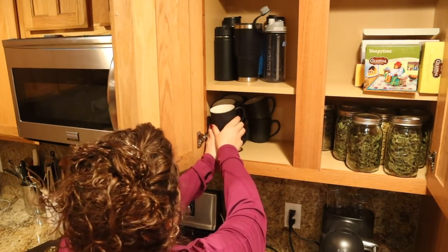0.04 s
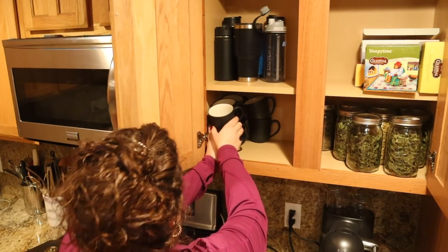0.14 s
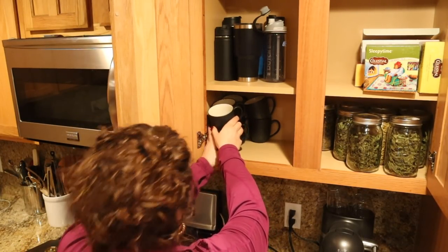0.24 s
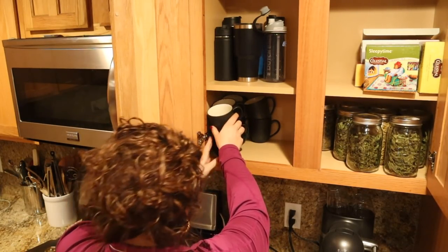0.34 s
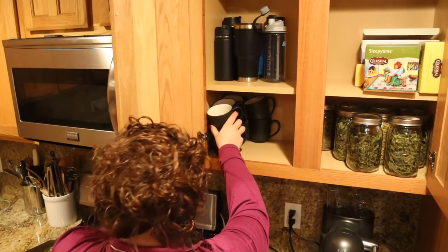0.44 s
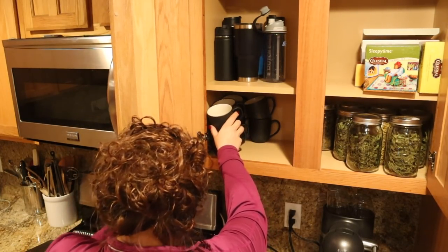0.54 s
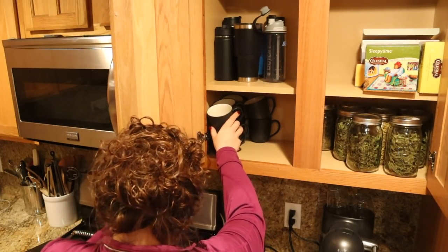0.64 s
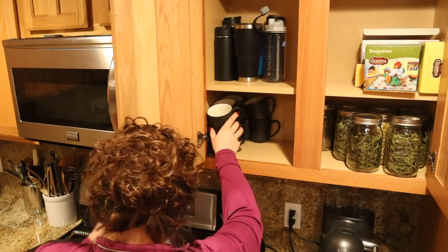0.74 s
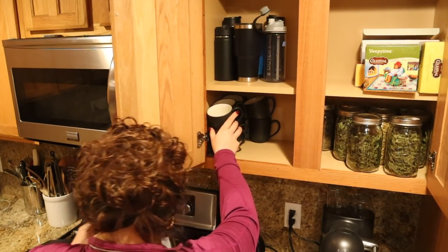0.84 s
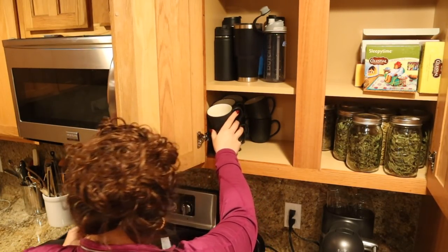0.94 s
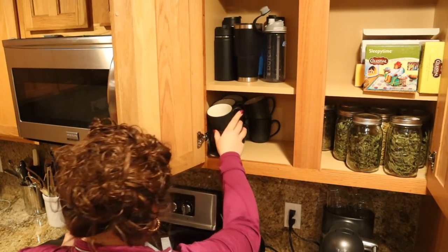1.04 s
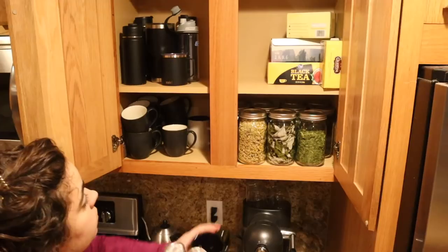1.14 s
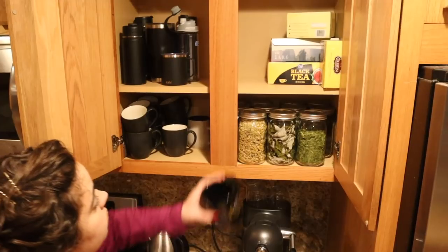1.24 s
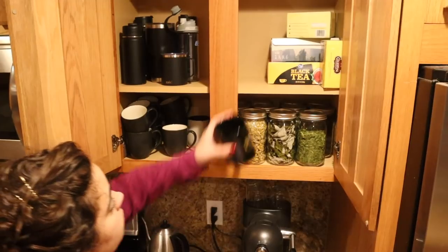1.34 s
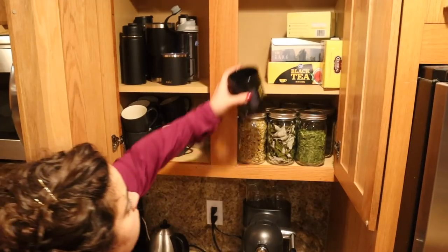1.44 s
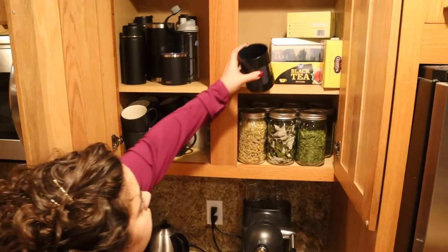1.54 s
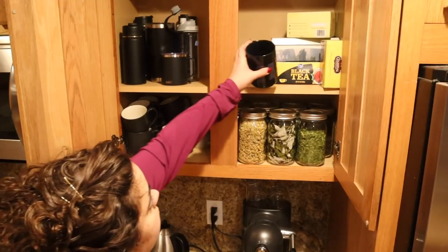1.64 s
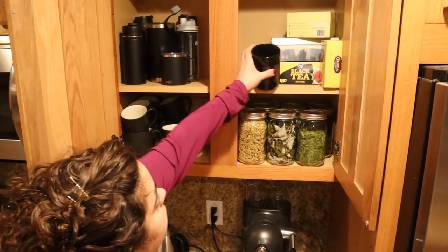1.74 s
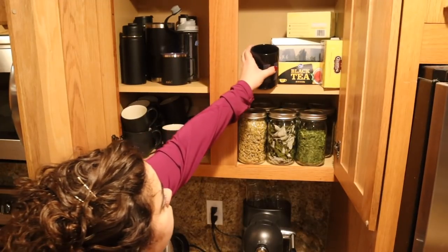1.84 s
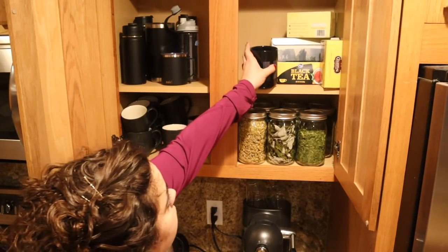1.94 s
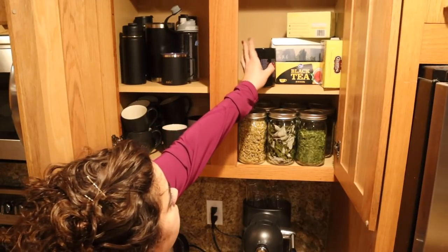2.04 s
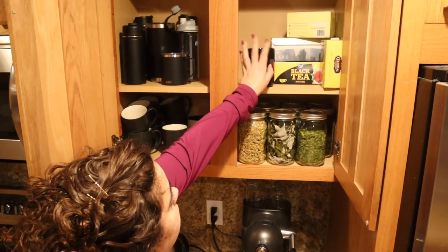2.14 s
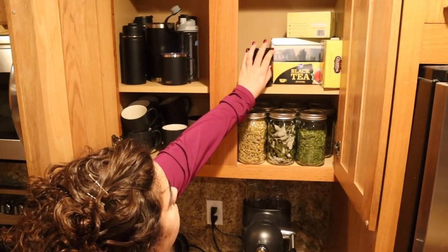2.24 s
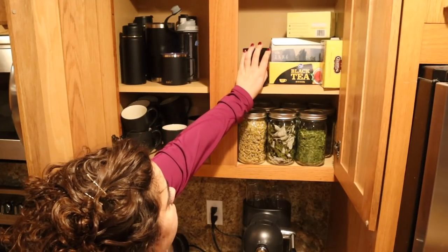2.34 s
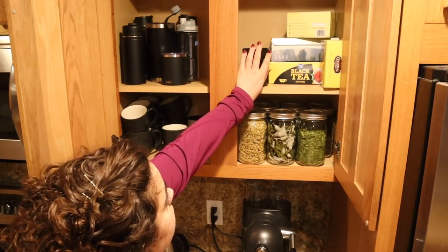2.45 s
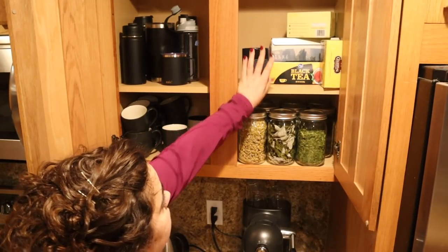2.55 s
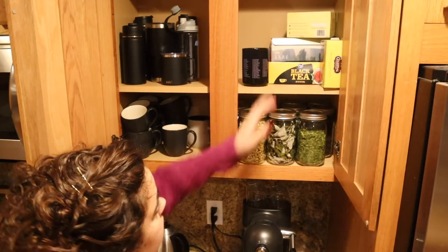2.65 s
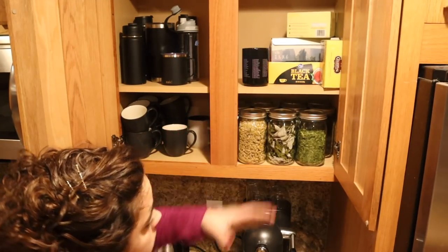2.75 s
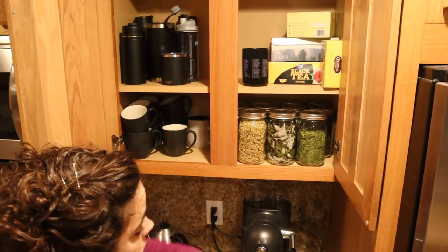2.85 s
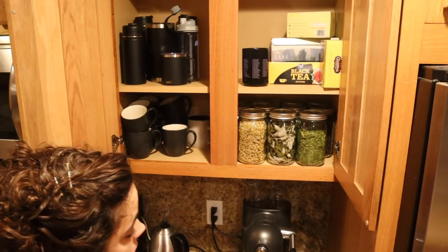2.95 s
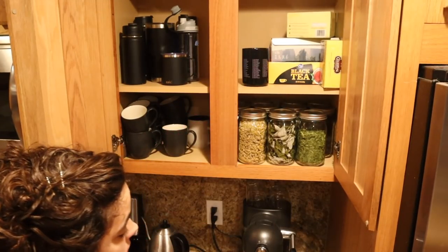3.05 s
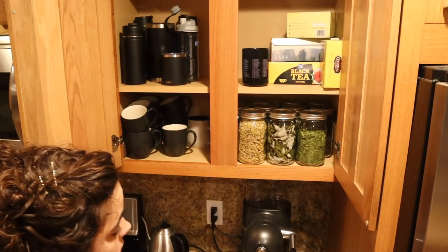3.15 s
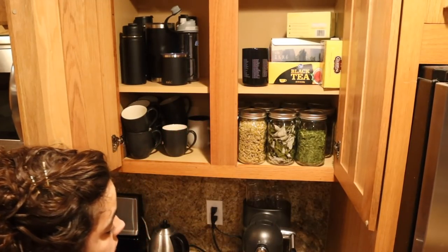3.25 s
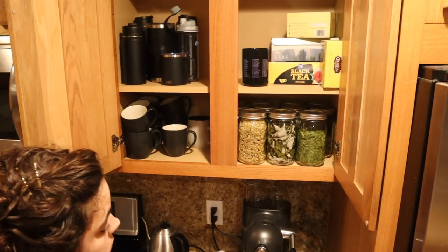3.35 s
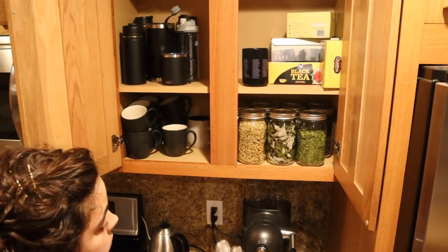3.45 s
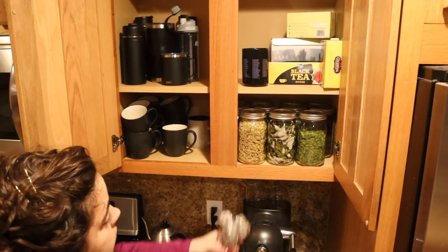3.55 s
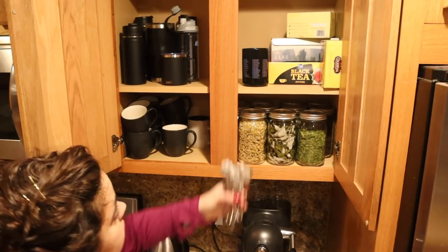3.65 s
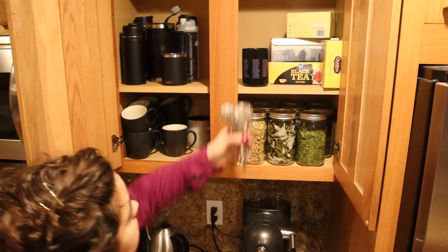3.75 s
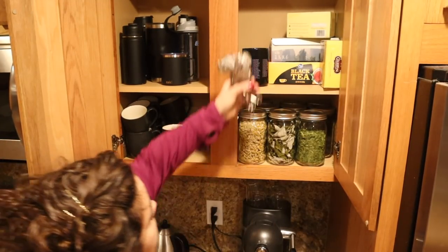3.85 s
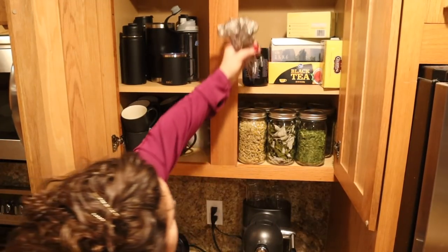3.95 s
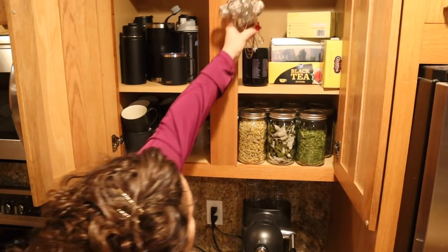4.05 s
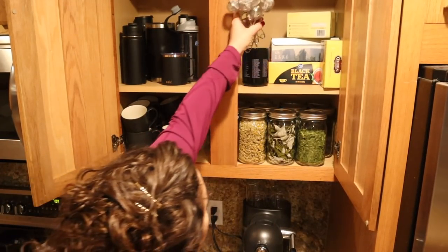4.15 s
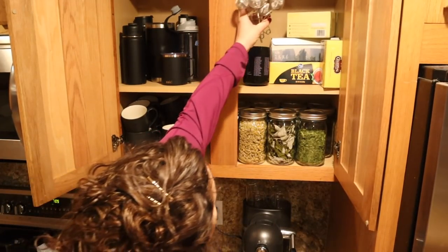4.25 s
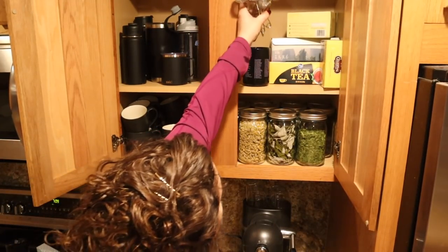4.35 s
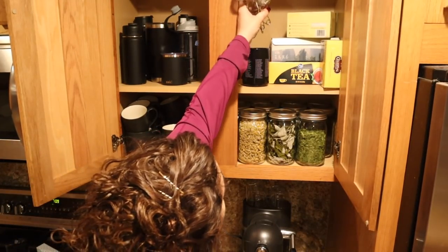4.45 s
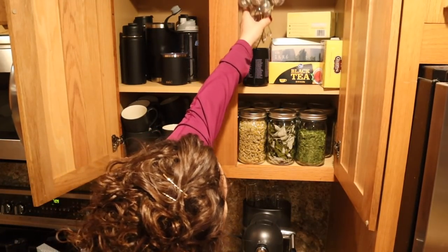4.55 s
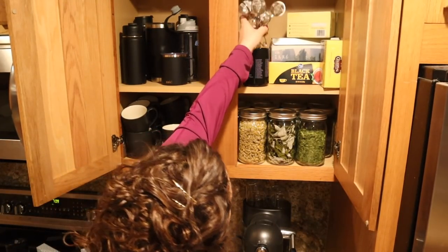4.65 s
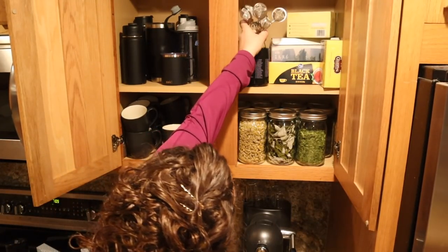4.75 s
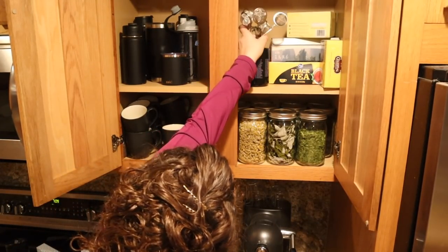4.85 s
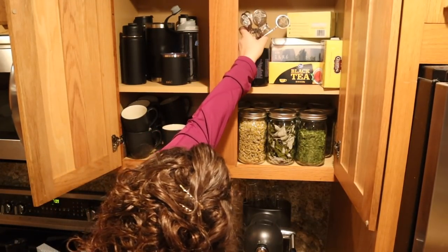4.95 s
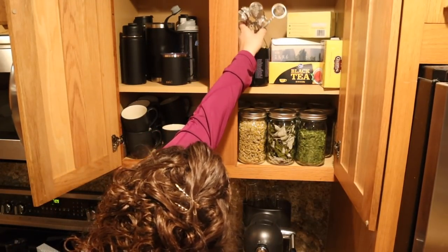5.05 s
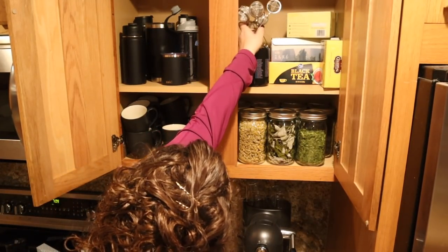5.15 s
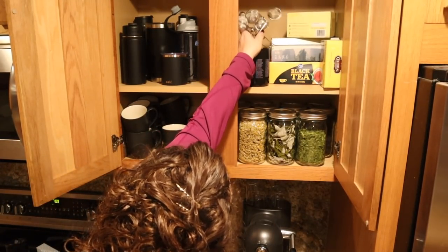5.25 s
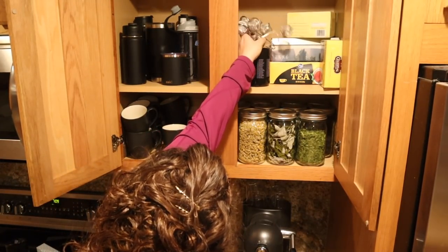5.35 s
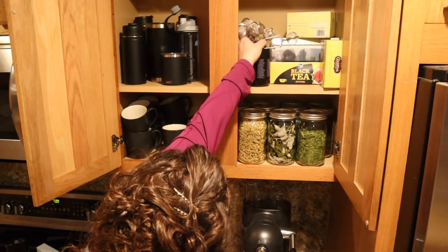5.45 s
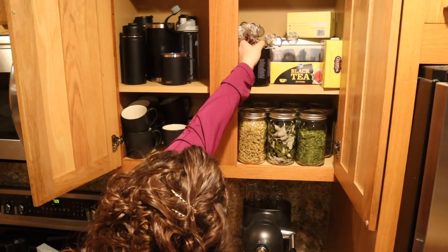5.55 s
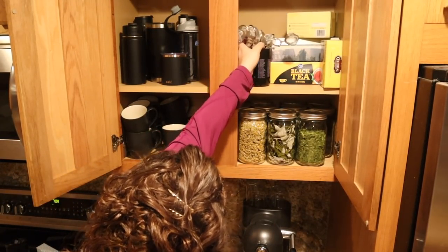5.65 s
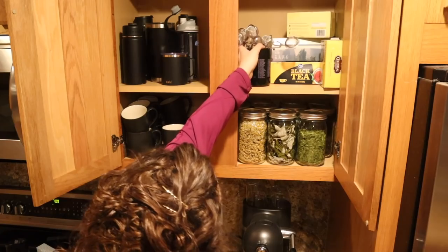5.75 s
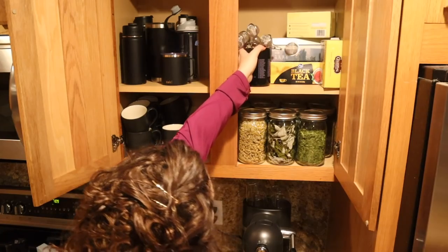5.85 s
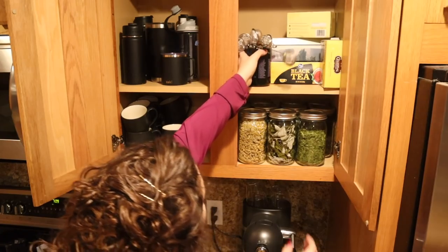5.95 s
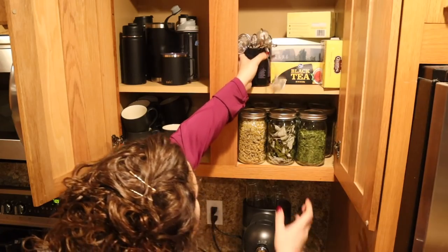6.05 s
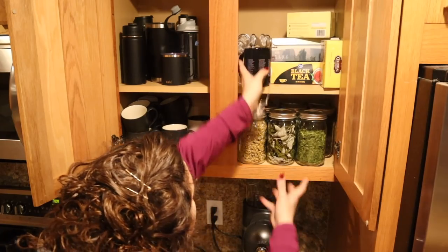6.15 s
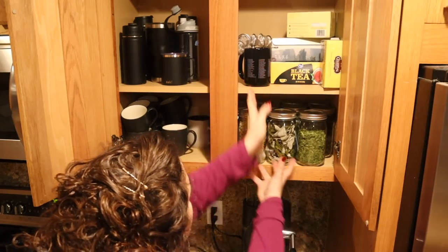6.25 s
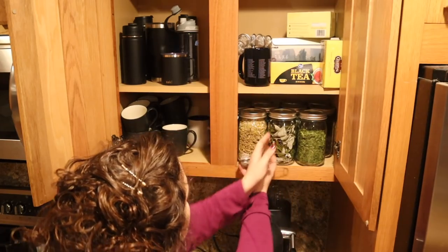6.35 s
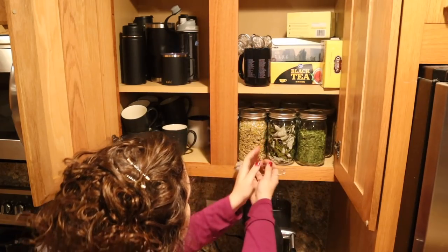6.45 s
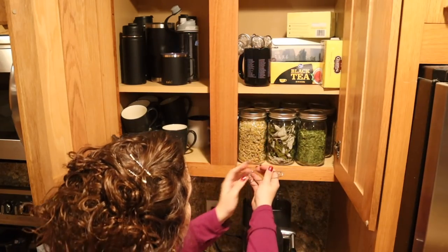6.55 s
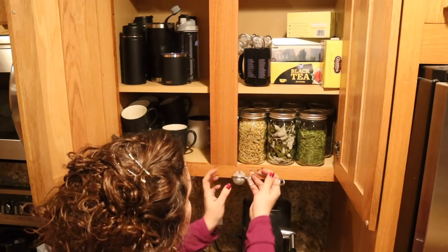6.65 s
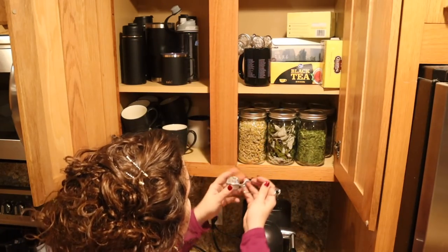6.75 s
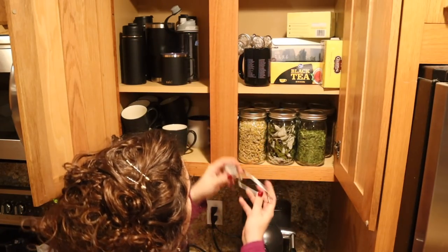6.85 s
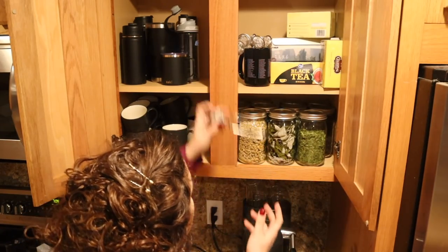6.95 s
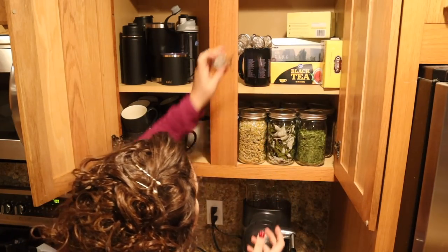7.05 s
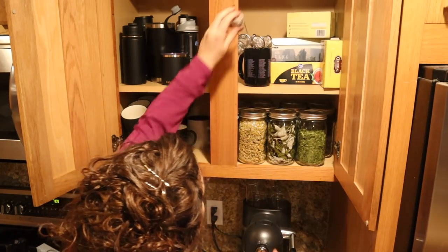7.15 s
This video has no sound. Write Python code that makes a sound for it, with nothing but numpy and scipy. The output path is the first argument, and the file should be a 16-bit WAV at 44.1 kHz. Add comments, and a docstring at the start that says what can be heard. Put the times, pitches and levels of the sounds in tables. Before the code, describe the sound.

In a kitchen cupboard, mugs scrape and stack, wood knocks as a tin is set down, and small metal strainers jingle brightly.

```python
"""Steel tea strainers are dropped into a tin in a wooden kitchen cupboard, jingle and rattle: modes rung by
hits and rubbing, with bursts and ticks of noise. Before that mugs are stacked and grind into each other, and
the tin is set on a shelf and pushed back; struck modes and coloured noise make these too. A sleeve and wire
mesh rustle as crackling noise. A fridge hums in wavering lines over a hush of noise, and this background steps
up at 1.14 s. Two close microphone ports listen, with cupboard and kitchen reflections around them."""
import sys
import numpy as np
from scipy import signal
from scipy.fft import rfft, irfft, next_fast_len
from scipy.io import wavfile

SR = 44100
rng = np.random.default_rng(int(sys.argv[2]) if len(sys.argv) > 2 else 0)


def unload_audio(sound):
    """Save the sound as a 16-bit wav file, at the path given as the first command line argument."""
    columns = np.transpose(np.atleast_2d(sound))
    # keep every value between -1 and 1, then stretch to whole-number steps
    steps = np.round(np.clip(columns, -1, 1) * 32767)
    wavfile.write(sys.argv[1], SR, steps.astype(np.int16))


N = 317520
T = np.arange(N) / SR

# Columns named "level/dB" are relative: each source trims them further.
# colour of the dull noise of wood and of the stacked mugs' taps: f/Hz, level/dB
THUMP_COLOUR = [(47, -49), (90, -33.5), (190, -7.5), (300, -10.5), (638, -2.5), (1380, -6.5), (2390, -18.5),
                (3630, -22.5), (6670, -40.5), (10800, -52.5), (12000, -55), (15600, -96), (22000, -120)]


def amp(db):
    """Decibels to gain."""
    return 10 ** (np.asarray(db) / 20)


def rms_one(x):
    """Scale to unit rms."""
    return x / np.sqrt(np.mean(x ** 2) + 1e-20)


def at_hz(points, hz):
    """Read a table on a log-frequency axis."""
    f, value = np.array(points)[:, 0], np.array(points)[:, 1]
    return np.interp(np.log(hz + 1), np.log(f + 1), value)


def shape(x, gain):
    """Apply a gain that depends on frequency."""
    size = next_fast_len(x.shape[-1])
    hz = np.arange(size // 2 + 1) * SR / size
    return irfft(rfft(x, size) * gain(hz), size)[..., :x.shape[-1]]


def colour(x, spectrum):
    """Give a sound the colour of a table of f/Hz and level/dB."""
    return shape(x, lambda hz: amp(at_hz(spectrum, hz)))


def tilt(hardness, hz, centre_hz):
    """Decibels that a harder or softer contact adds, levelling off away from the centre."""
    octaves = np.log2(hz / centre_hz + 1e-9)
    return hardness * np.clip(octaves, -1.5, 1.5)


def stroke(rows):
    """Gain over time of rubbing strokes that swell to a peak and fade, 20 dB in each given time."""
    gain = 0
    for s, db, swell_s, fade_s in rows:
        gain = gain + amp(db - 20 * np.maximum((s - T) / swell_s, (T - s) / fade_s))
    return gain


def hiss(spectrum):
    """Noise of a given colour, rms 1."""
    return rms_one(colour(rng.standard_normal(N), spectrum))


def grains(per_s, uneven_db):
    """Tiny random contacts of uneven size and either sign, rms 1."""
    sizes = amp(uneven_db * np.minimum(rng.exponential(1, N), 5))
    signs = rng.choice([-1, 1], N)
    return rms_one(sizes * signs * (rng.random(N) < per_s / SR))


def ring(push, hz, t60):
    """A two-pole resonator: a unit click sets a sine of height 1 ringing."""
    r = amp(-60 / (max(t60, .005) * SR))
    w = 2 * np.pi * hz / SR
    return signal.lfilter([0, np.sin(w)], [1, -2 * r * np.cos(w), r * r], push + 1e-18)


def struck(blows, modes, rub, grit, ring_db, spread_db, favour_db, centre_hz, chatter_s, reach):
    """Blows and rubbing drive the same modes; hard blows favour the high ones, each blow lands somewhere else
    and chatters through three weaker bounces."""
    s, level_db, hardness, *loudest = np.transpose(blows)
    lag = rng.random((len(s), 4)) * [0, 1, 1, 1]
    at = ((s[:, None] + chatter_s * lag) * SR).astype(int)
    luck = rng.normal(0, 1, (len(s), 4, len(modes)))
    out = 0
    for k, (hz, db, t60) in enumerate(modes):
        push = amp(db) * rub * np.roll(grit, k * SR // 7)      # each mode catches other grains
        # modes near the loudest ones of the blow are lifted; reach is in log frequency
        nearness = np.exp(-(np.log(hz / np.array(loudest)) / reach) ** 2).max(axis=0)
        spot_db = favour_db * nearness + tilt(hardness, hz, centre_hz)
        blow_db = level_db + ring_db + db + spot_db
        push[at] += amp(blow_db[:, None] - 10 * lag + spread_db * luck[..., k])
        out = out + ring(push * (-1) ** k, hz, t60)
    return out


def cracks(blows, spectrum, crack_db, t60, rise_s, centre_hz):
    """The noisy burst at each contact, rising quickly and dying fast."""
    out, size = np.zeros(N + SR), SR // 4
    fade = amp(-60 * T[:size] / t60) * (1 - np.exp(-T[:size] / rise_s))
    noises = rng.standard_normal((len(blows), size))
    for (s, level_db, hardness, *_), white in zip(blows, noises):
        burst = rms_one(colour(white, spectrum))
        tilted = shape(burst, lambda hz: amp(tilt(hardness, hz, centre_hz)))
        start = int(s * SR)
        out[start:start + size] += amp(level_db + crack_db) * fade * tilted
    return out[:N]


def patter(strokes, spectrum, per_s, uneven_db, t60):
    """Small knocks at random moments, each a short burst of coloured noise."""
    size = SR // 8
    burst = rng.standard_normal(size) * amp(-60 * T[:size] / t60)
    knocks = signal.fftconvolve(grains(per_s, uneven_db), burst)[:N]
    return stroke(strokes) * rms_one(colour(knocks, spectrum))


def rustle(strokes, spectrum, per_s):
    """A hiss with a fine crackle, made of coloured grains."""
    fibres = colour(grains(per_s, uneven_db=0), spectrum)
    return stroke(strokes) * rms_one(fibres)


def echoes(seconds, t60_of, channels):
    """A diffuse response of unit energy that builds up, its overlapping octave bands dying at their own rates."""
    t, out = T[:int(seconds * SR)], 0
    white = rng.standard_normal((channels, len(t)))
    for centre in 62.5 * 2. ** np.arange(9):
        band = shape(white, lambda hz: np.clip(1 - np.abs(np.log2(hz / centre + 1e-9)), 0, 1))
        out = out + band * amp(-60 * t / t60_of(centre))
    out = out * (1 - np.exp(-t / .006))      # builds up after the direct sound
    return out / np.sqrt(np.sum(out ** 2, axis=1, keepdims=True))


def ports(x):
    """The left port hears a little earlier, and the body shades the right one in the treble."""
    # level difference of the two ports: f/Hz, left minus right level/dB
    difference = [(60, 2.5), (240, -3), (950, -1), (3770, -1), (15000, 6.5)]
    lag_s = 45e-6
    left = shape(x, lambda hz: amp(at_hz(difference, hz) / 2))
    right = shape(x, lambda hz: amp(-at_hz(difference, hz) / 2) * np.exp(-2j * np.pi * hz * lag_s))
    return np.array([left, right])


def space(x, seconds, t60_of, shared_db, apart_db):
    """Reflections, one part reaching both ports alike and one part different on each; long waves stay alike."""
    shared, *apart = (signal.fftconvolve(x, r)[:N] for r in echoes(seconds, t60_of, channels=3))
    apart = signal.sosfilt(signal.butter(2, 300, "high", fs=SR, output="sos"), apart)
    return amp(shared_db) * ports(shared) + amp(apart_db) * apart


def room_tone():
    """Fridge lines that waver over a broad hush, alike on both sides in the bass."""
    # fridge and mains lines: f/Hz, level/dB
    hum_lines = [(59.2, -55), (118.4, -55), (204.6, -60.5), (360.7, -70.5), (468.3, -69.5), (597.5, -64.5)]
    # colour of the hush: f/Hz, level/dB
    air_colour = [(20, -45), (40, -12.5), (60, -6.5), (90, -14), (120, -5.5), (150, -12), (200, -9),
                  (240, -12), (600, -18), (1200, -24), (4000, -29.5), (9000, -33.5), (16000, -37)]
    # left-right likeness of the hush: f/Hz, likeness (0 to 1)
    air_alike = [(60, 0.71), (180, 0.8), (550, 0.3), (1650, 0.29), (4970, 0.47), (15000, 0.26)]
    before_db, step_s, step_db = -5.5, 1.144, 5   # hum and hush before the step, its time and height

    def alike(hz):
        return np.clip(at_hz(air_alike, hz), 0, 1)

    mid = shape(hiss(air_colour), lambda hz: np.sqrt(1 + alike(hz)))
    side = shape(hiss(air_colour), lambda hz: np.sqrt(1 - alike(hz)))
    air = amp(-57) * np.array([mid + side, mid - side])
    hum = 0
    for hz, db in hum_lines:
        waver = rms_one(ring(rng.standard_normal(N), hz, t60=0.36))
        steady = np.sin(2 * np.pi * hz * T + rng.uniform(0, 2 * np.pi))
        hum = hum + amp(db - 4.0) * (steady + min(hz / 250, .7) * waver)   # higher lines waver more
    return amp(before_db + step_db * (T > step_s)) * (air + hum)


def soft_rustle():
    """Many tiny contacts blur into a crackling hiss: a sleeve, then the bright hiss of the tin on the shelf."""
    # strokes of soft rustle, the last two the tin sliding on the shelf: t/s of the peak, level/dB, swell/s, fade/s
    strokes = [(1.186, -46, 0.061, 0.093), (1.506, -65.5, 0.26, 0.12), (1.708, -65, .4, 0.39),
               (2.3, -60.5, 0.023, 0.19), (2.364, -55.5, 0.12, 0.057)]
    # colour of the soft rustle: f/Hz, level/dB
    soft = [(710, -22), (1200, -3.5), (1590, -13.5), (2180, 0.5), (3050, 0), (3660, 4.5), (16000, -18.5)]
    return rustle(strokes, soft, per_s=5600)


def gathered_mesh():
    """Wire mesh rustles brightly in short strokes, as sparser grains."""
    # strokes of the wire mesh: t/s of the peak, level/dB, swell/s, fade/s
    moves = [(2.956, -46, 0.028, 0.045), (3.04, -55.5, 0.032, 0.31), (3.192, -46.5, 0.084, 0.019),
             (3.25, -52.5, .07, 0.073)]
    # colour of the wire: f/Hz, level/dB
    wire = [(880, -41), (1500, -5), (1790, -18), (3550, -3), (5440, 0), (15100, -5), (16000, -29)]
    return rustle(moves, wire, per_s=2100)


def mugs():
    """Stoneware rings when struck and sings under the grinding glaze; stacked, it only taps."""
    # mug against mug: t/s, level/dB, hardness (dB per octave), loudest mode f/Hz
    clinks = [(0.0034, -19, -3.5, 2620), (0.0657, -16, -11.5, 2440), (0.1276, -14.5, 0.5, 2710),
              (0.1514, -10.5, 4, 2980)]
    # ringing modes of the mugs: f/Hz, level/dB, t60/s
    mug_modes = [(670, -6, 0.12), (803, -12, 0.062), (1097, -7, 0.081), (1580, -17, 0.052),
                 (2375, -4.5, 0.07), (2436, -4.5, 0.051), (2546, 3, 0.051), (2700, -4.5, 0.11),
                 (2820, -7, 0.099), (2980, -8.5, 0.12), (3400, -24, .1), (3654, -1.5, 0.109),
                 (4030, -8, 0.13), (3690, -12, 0.17), (4070, -13, 0.15), (4380, -7, .08), (5470, -1, 0.14),
                 (5610, -11, 0.27), (6700, -14, 0.099), (6920, -7, 0.058), (6980, -1.5, 0.089),
                 (8980, -17.5, 0.31), (10100, -25, .1)]
    # colour of glaze on glaze: f/Hz, level/dB
    glaze = [(88, -46.5), (150, -13.5), (588, -13.5), (667, -4), (955, -12), (3810, -12.5), (5080, -27),
             (5560, -8), (6190, -22.5), (9190, -41), (11000, -44), (14300, -88), (22000, -120)]
    # mug grinding in mug: t/s of the peak, level/dB, swell/s, fade/s
    grinding = [(0.0, -24.5, .01, 0.058), (0.072, -24.5, 0.014, 0.056), (0.154, -22.5, 0.051, .045),
                (0.226, -32.5, 0.026, .2)]
    # the stacked pair rocks to rest under the hand: t/s, level/dB, hardness (dB per octave), loudest mode f/Hz
    rocking = [(0.451, -38.5, -8.5, 445), (0.513, -34, -4, 1474), (0.547, -44, -7, 780),
               (0.575, -43, -3, 450), (0.603, -33, 0, 770)]
    # damped modes of the stacked pair: f/Hz, level/dB, t60/s
    stack_modes = [(462, -11.5, 0.039), (747, -4, 0.026), (1545, -2, 0.035), (2435, 2, 0.057),
                   (3180, -2.5, 0.066), (3820, 3.5, 0.051)]
    grind, grit = stroke(grinding), grains(per_s=600, uneven_db=3.0)
    body = struck(clinks, mug_modes, amp(-32.5) * grind, grit, ring_db=-20, spread_db=3.0,
                  favour_db=8.0, centre_hz=2920, chatter_s=0.035, reach=0.051)
    crack = cracks(clinks, glaze, crack_db=-11.0, t60=.05, rise_s=0.0012, centre_hz=3000)
    taps = struck(rocking, stack_modes, 0, grit, ring_db=-15.5, spread_db=2.5,
                  favour_db=14.5, centre_hz=1520, chatter_s=0.0038, reach=0.093)
    taps += cracks(rocking, THUMP_COLOUR, crack_db=-9, t60=0.092, rise_s=0.0053, centre_hz=1470)
    return body + taps + crack + amp(-4.0) * grind * hiss(glaze)


def shelf():
    """Wood booms under each blow, rumbles under the sliding tin and carries the rattle inside it."""
    # blows on the shelf: t/s, level/dB, hardness (dB per octave), loudest mode f/Hz
    blows = [(0.064, -11.5, 2, 695), (1.802, -15, 6, 790), (1.812, -8.5, -4.5, 584),
             (1.902, -14.5, -4.5, 623), (1.966, -36.5, -11, 275), (2.049, -5, 1.5, 980),
             (2.151, -27.5, -5, 301), (4.201, -19.5, 6.5, 1525), (4.365, -7, 0, 1276),
             (4.374, -15, -5, 580), (4.43, -5.5, 0.5, 560), (4.437, -20, -9.5, 307),
             (5.199, -40.5, -5.5, 690), (5.469, -33.5, -5, 1000), (5.581, -31, -8.5, 594),
             (5.763, -33, -5, 285), (6.014, -32.5, 0, 1150), (6.167, -21, -4.5, 770), (6.289, -35, 1, 778),
             (6.437, -39, -4, 242), (6.692, -49.5, 6, 940)]
    # modes of the shelf: f/Hz, level/dB, t60/s
    wood_modes = [(106, -20, 0.07), (150, -14, 0.034), (232.5, -13, 0.097), (289.2, -4.5, 0.098),
                  (354.4, -2.5, 0.07), (592, -2.5, 0.085), (668, -5, 0.041), (775, -4, 0.07),
                  (890, -11, 0.043), (996, -2.5, 0.078), (1200, -16, 0.069), (1357, 3.5, 0.034),
                  (1540, -19, 0.091), (1705, -34, 0.031), (2290, -8, 0.04), (3050, -25, 0.013)]
    # tin sliding on wood: t/s of the peak, level/dB, swell/s, fade/s
    sliding = [(2.08, -51, 0.0088, 0.35), (2.3, -47, 0.03, 0.22), (2.39, -42, 0.096, 0.039)]
    # handles knocking about in the tin: t/s of the peak, level/dB, swell/s, fade/s
    rattling = [(5.5, -54.5, 0.8, 0.43), (6.17, -43.5, 0.8, 0.37), (6.52, -47, 0.035, 0.042)]
    slide, grit = stroke(sliding), grains(per_s=3000, uneven_db=0.5)
    body = struck(blows, wood_modes, amp(-33.5) * slide, grit, ring_db=-16.5, spread_db=-0.5,
                  favour_db=11, centre_hz=752, chatter_s=0.00609, reach=0.12)
    crack = cracks(blows, THUMP_COLOUR, crack_db=-2.5, t60=0.057, rise_s=0.0024, centre_hz=780)
    rumble = amp(-1) * slide * hiss(THUMP_COLOUR)
    rattle = patter(rattling, THUMP_COLOUR, per_s=200, uneven_db=2.5, t60=0.027)
    return body + crack + rumble + rattle


def strainers():
    """Steel rings in clear partials at each hit and under the scraping; the wire mesh ticks and rustles."""
    # steel on steel: t/s, level/dB, hardness (dB per octave), loudest low mode f/Hz, loudest high mode f/Hz
    jingles = [(4.1757, -17, 2, 3500, 6070), (4.2294, -39, -7, 2330, 6900), (4.2785, -25, 0.5, 5060, 6080),
               (4.7493, -32.5, 2, 2600, 7800), (4.815, -35.5, 4.5, 2570, 9680),
               (4.8545, -28.5, -3.5, 2360, 4200), (5.0958, -25, -1, 2480, 7500),
               (5.1073, -25.5, 0, 2460, 7500), (5.1951, -31.5, 3.5, 2480, 4900),
               (5.3102, -39, 9, 2570, 8000), (5.3268, -18.5, -1, 2480, 3510),
               (5.3708, -25.5, 1.5, 2430, 8100), (5.4393, -30.5, 4.5, 2500, 6080),
               (5.5515, -22.5, 1.5, 2520, 7970), (5.6022, -26, 1, 2520, 4100),
               (5.6896, -35.5, -9.5, 2460, 4170), (5.7487, -21.5, -5, 2534, 4400),
               (5.8308, -34.5, 5, 2420, 9650), (5.9282, -26.5, -1.5, 2460, 6960),
               (5.9579, -32.5, -4, 2460, 4170), (5.9807, -16, 3, 2513, 8070),
               (6.0656, -13.5, 2, 2514, 6080), (6.1078, -18.5, 0.5, 2530, 6090),
               (6.1677, -9.5, -0.5, 2578, 7500), (6.2308, -23.5, 7, 2390, 4180),
               (6.4223, -28.5, 0.5, 2760, 6080), (6.5276, -44.5, 9, 2600, 4150)]
    # modes of the strainers, near-alike pieces giving close pairs: f/Hz, level/dB, t60/s
    steel_modes = [(2376, -7.5, 0.22), (2428, -0.5, 0.14), (2507, -2, 0.16), (2558, 1, 0.14),
                   (2720, -13, 0.1), (3315, 0.5, 0.084), (3580, -1.5, 0.041), (3890, -12, 0.05),
                   (4106, -1, 0.09), (4185, -2.5, 0.12), (4320, -12, 0.1), (5100, 1.5, 0.084),
                   (5160, -5, 0.15), (6055, -5.5, 0.12), (6835, 1.5, 0.095), (7508, 2, 0.068),
                   (7930, 7, 0.057), (9170, -21, 0.052), (9650, 3, 0.074), (10300, -2, 0.053),
                   (11150, -24, 0.036), (13000, -13, 0.059), (13280, -15, 0.04), (14020, -10, 0.043)]
    # strainers rubbing on each other: t/s of the peak, level/dB, swell/s, fade/s
    scraping = [(4.18, -34, 0.0042, .1), (5.1, -51.5, 0.2, 0.067), (5.404, -39.5, 0.19, 0.29),
                (5.62, -42.5, .15, .3), (5.8, -48.5, 0.25, 0.23), (6.0, -43.5, 0.25, 0.37),
                (6.184, -36.5, 0.13, 0.18), (6.51, -42.5, 0.043, 0.024)]
    # colour of the ticks: f/Hz, level/dB
    tick = [(470, -9), (800, -9), (1900, -15.5), (2530, 3), (3790, -13), (7640, 3.5), (8550, -11),
            (10100, -4), (13000, -12.5), (16000, -28)]
    # colour of the mesh: f/Hz, level/dB
    mesh = [(470, -39), (800, -21), (1390, -10.5), (2050, -38), (2500, -19.5), (3100, -13), (5940, -12),
            (6410, -9.5), (16000, -25)]
    scrape, grit = stroke(scraping), grains(per_s=300, uneven_db=3.5)
    body = struck(jingles, steel_modes, amp(-38.0) * scrape, grit, ring_db=-24, spread_db=3.5,
                  favour_db=9.5, centre_hz=4870, chatter_s=.02, reach=0.02)
    crack = cracks(jingles, tick, crack_db=-2, t60=0.028, rise_s=0.00099, centre_hz=5230)
    ticks = amp(-8.5) * patter(scraping, tick, per_s=40, uneven_db=2.0, t60=0.017)
    return body + crack + ticks + amp(-7.5) * rustle(scraping, mesh, per_s=2200)


def scene():
    """The cupboard box smears each attack, the kitchen adds the tail."""
    # decay of the kitchen: f/Hz, t60/s
    kitchen_t60 = [(100, 0.97), (500, 0.51), (2000, 0.73), (6000, 0.46), (14000, 0.26)]
    close = soft_rustle() + gathered_mesh() + mugs() + shelf() + strainers()
    box = space(close, 0.11, lambda hz: .05, shared_db=-10.5, apart_db=-10)
    kitchen = space(close, .8, lambda hz: at_hz(kitchen_t60, hz), shared_db=-16, apart_db=-13.5)
    return ports(close) + box + kitchen + room_tone()


def record(dry):
    """Rumble is rolled off, the loudest peaks are rounded, the top is cut."""
    cutoff_hz = 16700
    dry = signal.sosfilt(signal.butter(2, 45, "high", fs=SR, output="sos"), dry)
    rounded = 0.8 * np.tanh(dry / 0.82)
    return signal.sosfilt(signal.cheby2(14, 70, cutoff_hz, fs=SR, output="sos"), rounded)


dry = scene()
out = record(dry)
unload_audio(out)
```